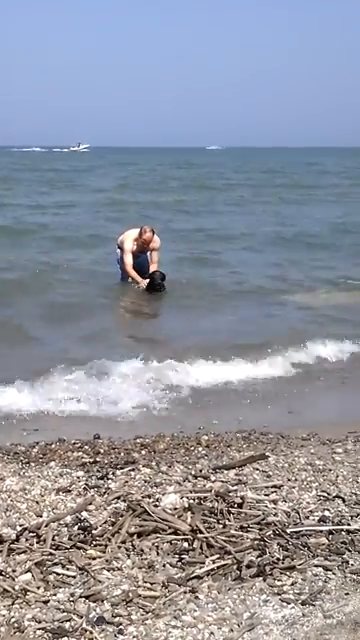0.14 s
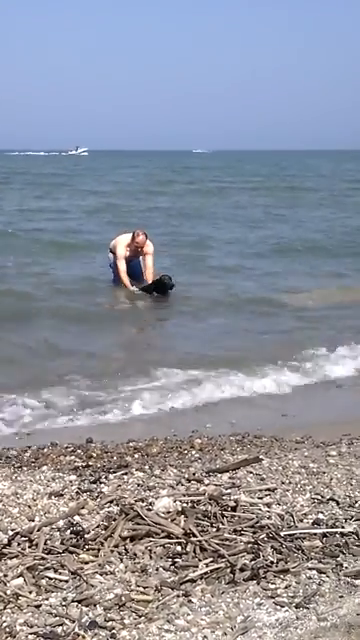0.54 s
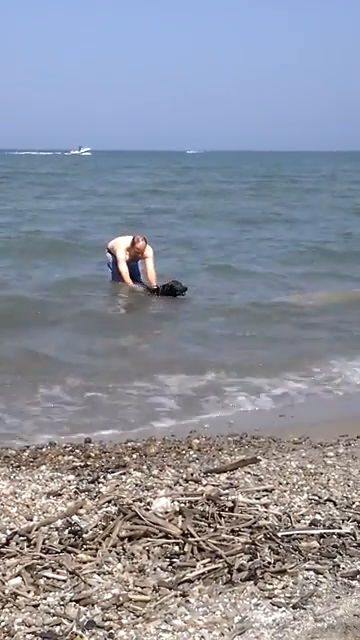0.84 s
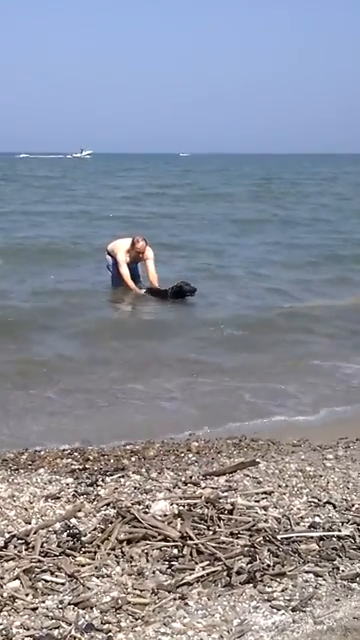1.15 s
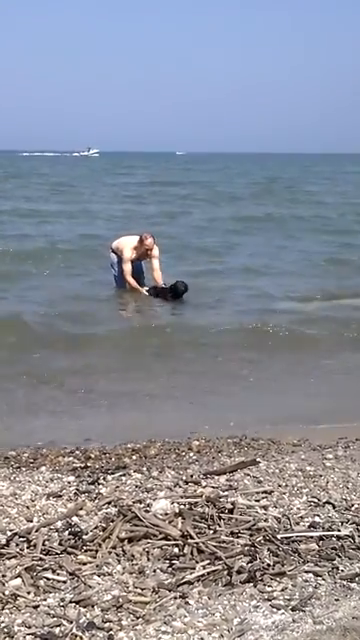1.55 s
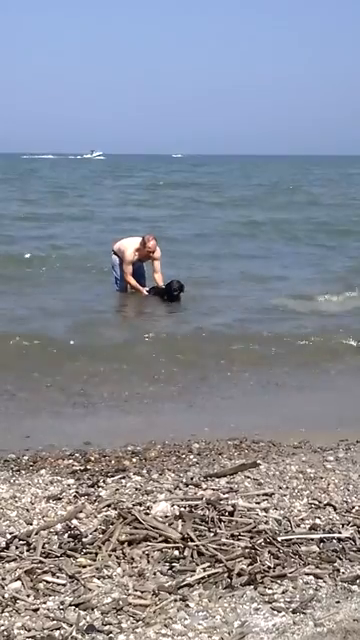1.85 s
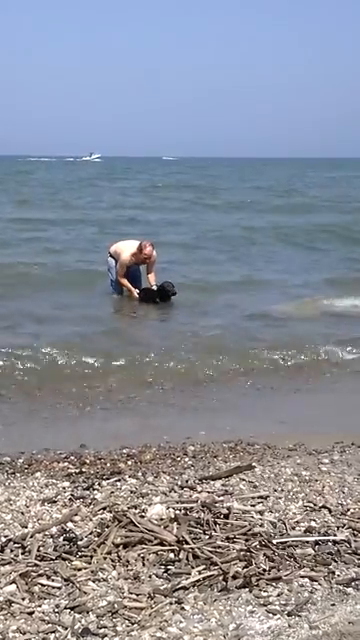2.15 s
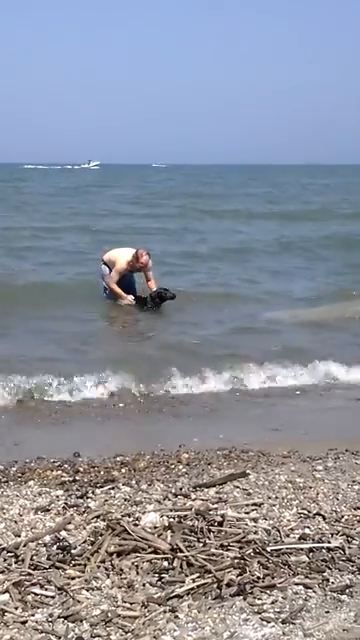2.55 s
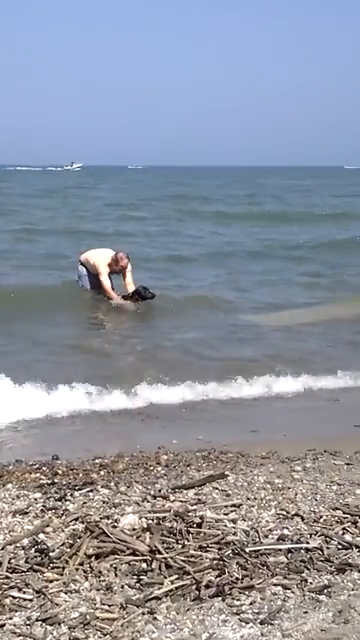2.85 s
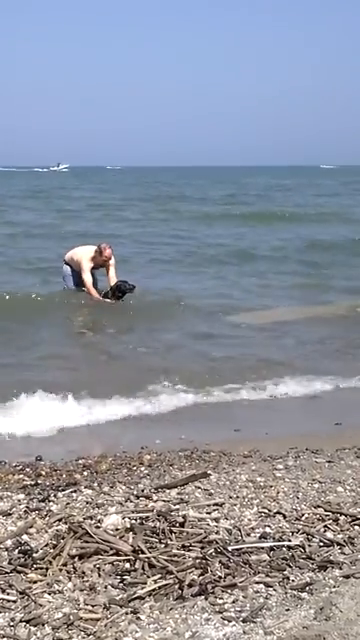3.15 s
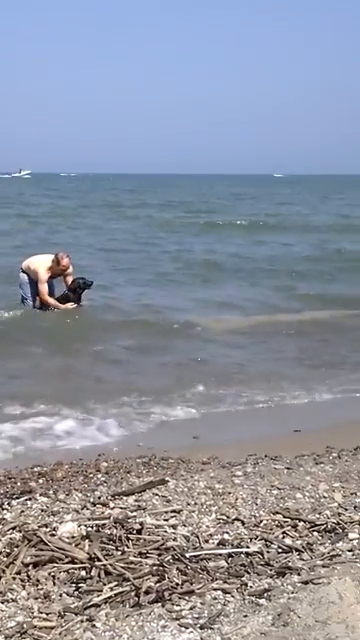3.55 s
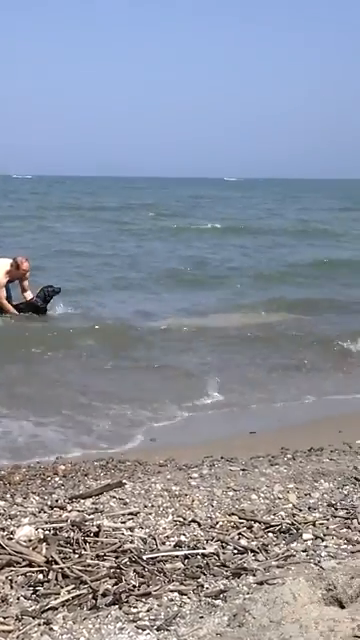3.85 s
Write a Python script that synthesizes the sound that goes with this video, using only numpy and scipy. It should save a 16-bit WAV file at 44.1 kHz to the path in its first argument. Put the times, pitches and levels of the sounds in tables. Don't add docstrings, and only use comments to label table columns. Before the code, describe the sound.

Steady lapping surf with low bubbly churn and soft foam hiss, then a short burst of splashes and sharp water slaps, a far bird's whistle, and more gulps; open shore, thin-sounding, nearly mono small microphone.

```python
import sys
import numpy as np
from scipy import signal
from scipy.fft import rfft, irfft
from scipy.io import wavfile
from scipy.ndimage import uniform_filter1d

SR = 44100
rng = np.random.default_rng(int(sys.argv[2]) if len(sys.argv) > 2 else 0)


def transcribe(u):
    v = np.clip(np.atleast_2d(u).T, -1, 1)
    q = np.round(v * 32767).astype(np.int16)
    wavfile.write(sys.argv[1], SR, q)


def voltage_ratio(decibels):
    exponent = np.asarray(decibels, float) / 20
    return 10 ** exponent


N = 176400

# time [s], churn level [dB], foam level [dB].
SURF_SWELL = [(0, -32.5, -29), (.12, -29, -27.5), (.3, -30, -27), (.55, -28.5, -29), (.9, -31.5, -28),
              (1.1, -32.5, -29), (1.35, -30, -28.5), (1.55, -33, -29.5), (1.9, -31, -30), (2.2, -31, -29.5),
              (2.45, -30, -29), (2.85, -29.5, -28), (3.05, -29, -30), (3.4, -29, -29), (3.65, -30, -29.5),
              (3.8, -29, -28), (4, -27, -29)]
# frequency [Hz], density [dB per Hz].
CHURN_SPECTRUM = [(130, -22), (280, 2), (480, 0.5), (650, 5), (900, 3), (1150, -1.5), (2000, -4),
                  (4000, -29)]
# frequency [Hz], density [dB per Hz].
FOAM_SPECTRUM = [(500, -7.5), (1500, -2), (2600, -2.5), (3200, -4), (5200, -6.5), (6300, -14.5),
                 (8300, -20), (11200, -32.5)]
# time [s], large bubbles [dB], small bubbles [dB].
BUBBLE_BALANCE = [(0, 3, 4), (.9, 5, 0.5), (1.1, -3, -12), (2.3, -1.5, 1.5), (2.75, 0, 0.5),
                  (3.2, -9.5, 4.5), (3.5, 2.5, -4), (4, -1, -0.5)]
# multiple of the firing rate, level before the microphone [dB].
ENGINE_ORDERS = [(2, -51.5), (3, -55), (4, -49), (5, -49), (6, -51.5)]
# time [s], level [dB].
WIND_PUFFS = [(.003, -29), (1.72, -42), (2.08, -36), (2.58, -49), (2.775, -33.5), (2.84, -38), (3.39, -29),
              (3.52, -35), (3.57, -32), (3.72, -36), (3.77, -32)]
# centre [s], half length [s], level [dB],
# pitch [Hz], width [Hz].
BRIEF_SURGES = [(0.038, .05, -35, 270, 60), (0.18, .12, -35, 1800, 300), (0.27, 0.051, -34, 1350, 200),
                (0.45, 0.057, -34.5, 287, 60), (.8, .08, -36.5, 1770, 250), (1.16, 0.11, -37, 1880, 200),
                (1.154, 0.075, -37.5, 304, 80), (2.642, 0.065, -36.5, 1360, 250),
                (2.68, 0.093, -33.5, 2150, 300), (2.77, 0.055, -36, 1320, 250),
                (3.497, 0.079, -34.5, 344, 90), (3.72, 0.099, -41, 350, 80), (3.85, .1, -35.5, 1550, 250),
                (2.9, 0.076, -33, 4100, 2100), (1.794, 0.099, -43.5, 290, 50),
                (0.91, 0.098, -44.5, 420, 140), (2.9, 0.088, -38, 1500, 300),
                (0.09, 0.087, -43, 5000, 1100), (0.25, 0.04, -40, 2900, 800),
                (3.77, 0.036, -41, 3100, 1100), (1.1, 0.13, -51, 9000, 2000),
                (2.66, 0.075, -43, 5900, 2500), (0.91, 0.18, -43, 640, 250)]
# start [s], length [s], level [dB], brightness [dB per octave].
CREST_SPLASHES = [
    (0.076, 0.31, -37, -4),
    (2.468, .13, -31, -0.5),
    (2.585, 0.092, -27, 1.5),
    (2.683, 0.058, -29, -1),
    (2.72, 0.11, -32, -4),
    (3.12, 0.014, -29.5, 3),
    (3.708, 0.032, -33, 0),
]
# time [s], level [dB], pitch [Hz].
AIR_POCKETS = [(0.099, -28.5, 610), (0.18, -33, 607), (0.247, -32, 620), (0.247, -29, 900),
               (0.279, -26, 730), (0.357, -29, 600), (0.432, -33, 590), (0.482, -28, 580),
               (0.522, -30.5, 530), (0.578, -38, 595), (0.61, -31, 625), (0.784, -31, 710),
               (0.894, -26, 564), (0.894, -32, 800), (1.039, -32, 512), (1.123, -31, 840),
               (1.202, -28, 614), (1.463, -31, 840), (1.756, -28.5, 870), (1.904, -37, 830),
               (2.154, -32, 890), (2.165, -29, 685), (2.203, -30, 694), (2.241, -34, 745),
               (2.244, -30, 577), (2.363, -26, 910), (2.456, -31, 615), (2.514, -34, 670),
               (2.537, -25.5, 826), (2.577, -41, 780), (2.618, -27, 697), (2.641, -30, 850),
               (2.656, -36, 980), (2.667, -26, 826), (2.688, -27, 680), (2.699, -29, 910),
               (2.714, -31, 690), (2.76, -34, 640), (2.781, -28, 870), (2.801, -29, 700), (2.853, -32, 700),
               (2.914, -31, 533), (2.966, -29, 676), (3.071, -28.5, 766), (3.164, -29, 780),
               (3.193, -30, 780), (3.352, -25, 840), (3.393, -32, 673), (3.422, -32, 870),
               (3.527, -29, 528), (3.538, -26, 750), (3.567, -29, 880), (3.593, -25.5, 880),
               (3.692, -35, 607), (3.692, -29, 870), (3.75, -27, 910), (3.811, -25, 824), (3.846, -35, 880),
               (3.886, -25, 930), (3.91, -27, 588)]
# centre [s], level [dB], lowest [Hz], highest [Hz].
SIDE_BURSTS = [
    (.783, -51, 6200, 7700),
    (2.06, -40, 4100, 5750),
    (2.06, -51, 6200, 8350),
    (2.989, -47, 5600, 7700),
]
# time [s], peak level [dB], hollow pitch [Hz].
WATER_SLAPS = [
    (.895, -17, 680),
    (2.639, -14, 1500),
    (2.651, -14, 2200),
    (2.668, -12, 1380),
    (2.742, -11, 2200),
    (2.77, -11, 1530),
    (3.747, -19, 880),
    (3.882, -19, 900),
    (3.906, -18, 620),
]
# time [s], pitch [Hz], level [dB].
BIRD_NOTE = [
    (2.66, 2300, -46),
    (2.7, 2365, -39),
    (2.79, 2345, -39),
    (2.86, 2435, -35),
    (3.03, 2468, -37),
    (3.08, 2452, -38),
    (3.15, 2485, -39.5),
    (3.21, 2495, -42),
    (3.25, 2500, -52),
]


def evened(x):
    return x / np.sqrt(np.mean(x ** 2) + 1e-20)


def read(points, hz):
    f, value = np.transpose(points)
    return np.interp(np.log(hz + 1), np.log(f + 1), value)


def drift(rate_hz):
    t = np.arange(0, N + 128, 64) / SR
    slow = 0
    for f in rate_hz * np.geomspace(1 / 16, 1, num=24):
        slow = slow + np.sin(2 * np.pi * (f * t + rng.random())) / np.sqrt(f)
    return np.interp(np.arange(N) / SR, t, evened(slow))


def hiss(spectrum, patch_db, streak_db):
    hz = np.fft.rfftfreq(512, 1 / SR)
    real, imaginary, patches, streaks = rng.standard_normal((N // 128 + 5, 257, 4)).T
    patches = uniform_filter1d(patches, size=5, axis=0)
    patches = evened(uniform_filter1d(patches, size=30, axis=1))
    streaks = uniform_filter1d(streaks, size=50, axis=0)
    streaks = evened(uniform_filter1d(streaks, size=6, axis=1))
    level_db = read(spectrum, hz)[:, None] + patch_db * patches + streak_db * streaks
    z = (real + 1j * imaginary) * voltage_ratio(level_db)
    return evened(signal.istft(z, nperseg=512, noverlap=384)[1][:N])


def ping(hz, cycles, glide):
    u = np.arange(0, 4 * cycles, hz / SR) / cycles
    envelope = (1 - np.exp(-8 * u)) * np.exp(-2 * u)
    return envelope * np.sin(2 * np.pi * cycles * u * (1 + glide * u))


def grains(per_s, spread_db, low_hz, high_hz, cycles, spectrum):
    born = rng.random(N) < per_s / SR
    size = voltage_ratio(spread_db * np.minimum(rng.exponential(1, N), 5)) * born
    kind = rng.integers(0, 24, N)
    out = np.zeros(N)
    for k, hz in enumerate(np.geomspace(low_hz, high_hz, num=24)):
        bubble = voltage_ratio(read(spectrum, hz)) * hz * ping(hz, cycles, glide=.08)
        out += signal.oaconvolve(size * (kind == k), bubble)[:N]
    return evened(out)


def surf():
    t = np.arange(N) / SR
    s, churn_db, foam_db = np.transpose(SURF_SWELL)
    when, large_db, small_db = np.transpose(BUBBLE_BALANCE)
    split_hz = 721.5
    large = grains(220, 1.2, 495, split_hz, cycles=9, spectrum=CHURN_SPECTRUM)
    small = grains(220, 1.2, split_hz, 1048, cycles=9, spectrum=CHURN_SPECTRUM)
    bubbles = voltage_ratio(np.interp(t, when, large_db)) * large + voltage_ratio(np.interp(t, when, small_db)) * small
    fizz = grains(2500, 4, 1353, 5930, cycles=3.9, spectrum=FOAM_SPECTRUM)
    churn = evened(hiss(CHURN_SPECTRUM, patch_db=0.7, streak_db=-0.15) + voltage_ratio(-12) * bubbles)
    foam = evened(hiss(FOAM_SPECTRUM, patch_db=0.54, streak_db=0.71) + voltage_ratio(-12.5) * fizz)
    churn_gain = voltage_ratio(np.interp(t, s, churn_db))
    foam_gain = voltage_ratio(np.interp(t, s, foam_db) + 0.24 * drift(12))
    return churn_gain * churn + foam_gain * foam


def boat():
    firing_hz, wander, waver_db = 69.7, .004, 2.5
    turns = np.cumsum(firing_hz * (1 + wander * drift(1.987))) / SR
    out = np.zeros(N)
    for order, db in ENGINE_ORDERS:
        level = np.sqrt(2) * voltage_ratio(db + waver_db * drift(4.83))
        out += level * np.sin(2 * np.pi * (order * turns + rng.random()))
    return out


def wind():
    t = np.arange(N) / SR
    low = signal.lfilter(*signal.butter(2, 70, fs=SR), rng.standard_normal(N))
    puff_s = 0.013
    puffs = sum(voltage_ratio(db) * np.exp(-((t - s) / puff_s) ** 2) for s, db in WIND_PUFFS)
    buffeting = voltage_ratio(-58 + 4 * drift(9.3))
    return (buffeting + puffs) * evened(low)


def band(hz, width_hz):
    bell = np.exp(-2 * ((np.fft.rfftfreq(N, 1 / SR) - hz) / width_hz) ** 2)
    return evened(irfft(rfft(rng.standard_normal(N)) * bell, N))


def surges():
    t = np.arange(N) / SR
    out = np.zeros(N)
    for s, half_s, db, hz, width_hz in BRIEF_SURGES:
        out += voltage_ratio(db) * np.exp(-((t - s) / half_s) ** 2) * band(hz, width_hz)
    return out


def splashes():
    t, hz = np.arange(N) / SR, np.fft.rfftfreq(N, 1 / SR)
    rise_s, fall_s, grain_db = .045, .045, 2
    body = np.sqrt(voltage_ratio(2 * read(FOAM_SPECTRUM, hz)) + voltage_ratio(2 * read(CHURN_SPECTRUM, hz)))
    out = np.zeros(N)
    for start, length, db, tilt_db in CREST_SPLASHES:
        grain = evened(uniform_filter1d(rng.standard_normal(N), size=150))
        spray = rng.standard_normal(N) * voltage_ratio(grain_db * grain)
        tilt = voltage_ratio(tilt_db * np.log2(hz / 1500 + .1))
        spray = evened(irfft(rfft(spray) * body * tilt, N))
        rise = np.clip((t - start) / rise_s, 0, 1)
        fall = np.exp(-np.maximum(t - start - length, 0) / fall_s)
        out += voltage_ratio(db) * rise * fall * spray
    return out


def gulps():
    cycles, gain_db = 14.03, 8
    out = np.zeros(N + SR)
    for s, db, hz in AIR_POCKETS:
        note = ping(hz, cycles, glide=0.026)
        at = round((s - 0.351 * cycles / hz) * SR)
        out[at:at + len(note)] += voltage_ratio(db + gain_db) * note
    return out[:N]


def slips():
    t, hz = np.arange(N) / SR, np.fft.rfftfreq(N, 1 / SR)
    side = np.zeros(N)
    for s, db, low_hz, high_hz in SIDE_BURSTS:
        passed = (hz > low_hz) * (hz < high_hz)
        noise = evened(irfft(rfft(rng.standard_normal(N)) * passed, N))
        shape = np.cos(np.pi / 2 * np.clip((t - s) * SR / 1024, -1, 1)) ** 1.5
        side += voltage_ratio(db) * shape * noise
    return np.array([side, -side])


def slaps():
    click_s = .00006
    out = np.zeros(N + SR)
    for s, db, hz in WATER_SLAPS:
        plop = ping(hz, cycles=3, glide=.08)
        u = np.arange(len(plop)) / SR / click_s - 3
        click = (1 - u ** 2 / 2) * np.exp(-u ** 2 / 2)
        at = round(s * SR)
        out[at:at + len(plop)] += voltage_ratio(db) * (plop + voltage_ratio(-3) * click)
    return out[:N]


def whistle():
    t = np.arange(N) / SR
    s, hz, db = np.transpose(BIRD_NOTE)
    wobble_hz, flutter_db = 4, 1.2
    turns = np.cumsum(np.interp(t, s, hz) + wobble_hz * drift(25)) / SR
    level_db = np.interp(t, s, db, left=-np.inf, right=-np.inf) + flutter_db * drift(120)
    return np.sqrt(2) * voltage_ratio(level_db) * np.sin(2 * np.pi * turns)


def scene():
    water = surf() + surges() + splashes() + gulps() + slaps()
    return np.tile(water + boat() + wind() + whistle(), (2, 1))


def starve(x):
    hop = 1024
    line = np.arange(330, 560)[:, None]
    n = np.arange(2 * hop) + .5
    window = np.sqrt(2 / hop) * np.sin(np.pi * n / (2 * hop))
    basis = window * np.cos(np.pi / hop * (n + hop / 2) * (line + .5))
    blocks = np.pad(x[0], (hop, 2 * hop - N % hop)).reshape(-1, hop)
    lines = np.hstack([blocks[:-1], blocks[1:]]) @ basis.T
    block_rms = np.sqrt(np.mean(lines ** 2, axis=1, keepdims=True))
    loudness = block_rms / np.sqrt(np.mean(lines ** 2)) + 1e-6
    step = loudness * voltage_ratio(-35.5 + 2.5 * rng.standard_normal((len(lines), 1)))
    rounded = np.sign(lines) * np.floor(abs(lines) / step + 0.41) * step
    change = (rounded - lines) @ basis
    return x + (change[1:, :hop] + change[:-1, hop:]).ravel()[:N]


def roll_off(x):
    return signal.sosfilt(signal.butter(12, 11100, fs=SR, output="sos"), x)


def record(dry):
    bass_cut = signal.butter(4, 157, "high", fs=SR, output="sos")
    top_cut = signal.butter(6, 10300, fs=SR, output="sos")
    thin = signal.sosfilt(bass_cut, dry) + voltage_ratio(-39) * dry
    thin = signal.sosfilt(top_cut, thin)
    return roll_off(starve(thin) + slips())


dry = scene()
out = record(dry)
transcribe(out)
```